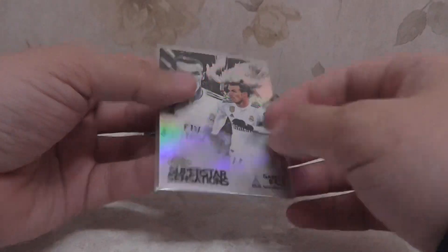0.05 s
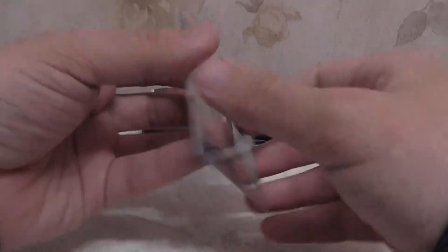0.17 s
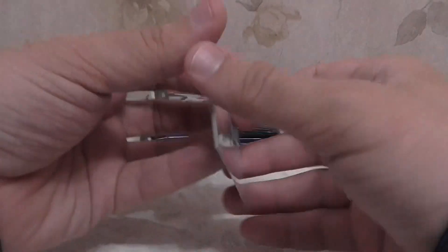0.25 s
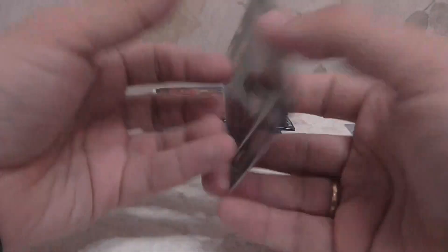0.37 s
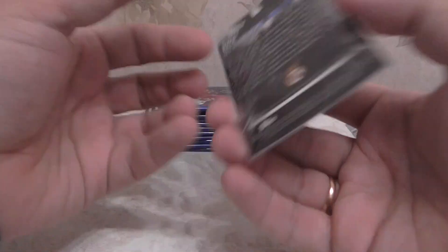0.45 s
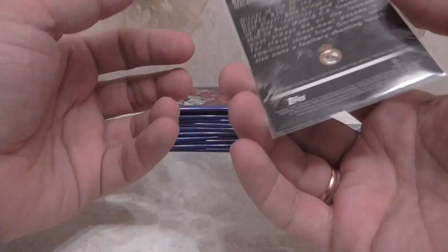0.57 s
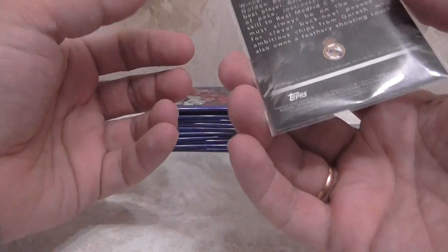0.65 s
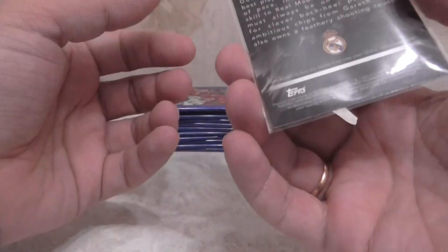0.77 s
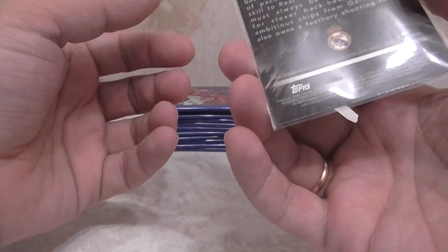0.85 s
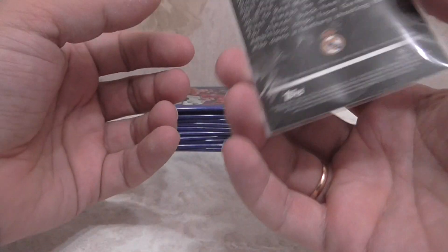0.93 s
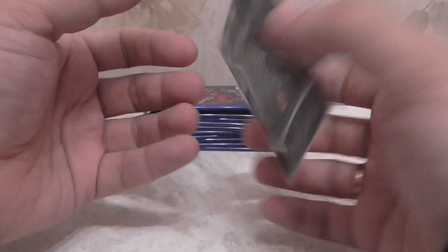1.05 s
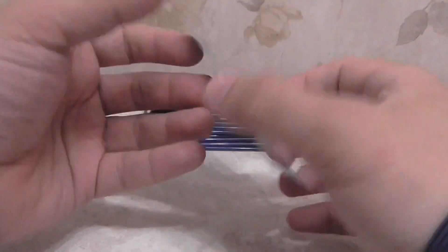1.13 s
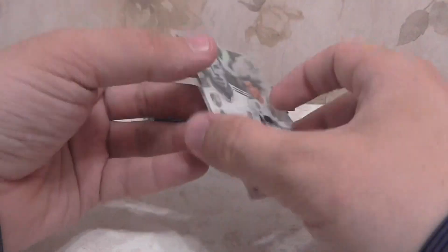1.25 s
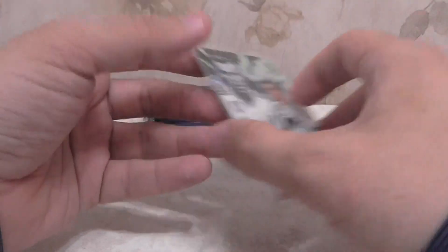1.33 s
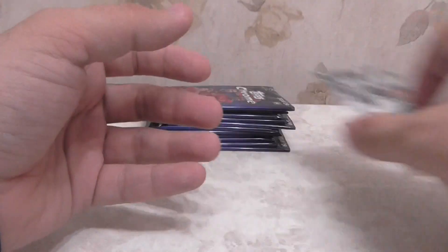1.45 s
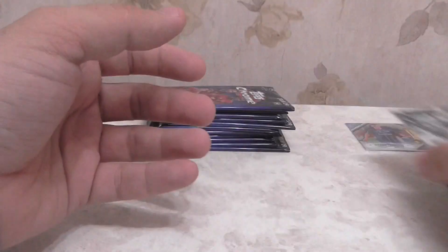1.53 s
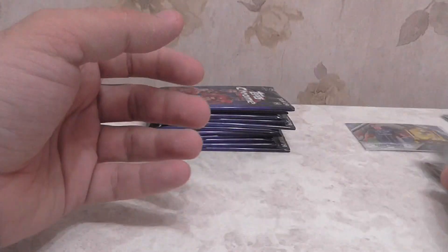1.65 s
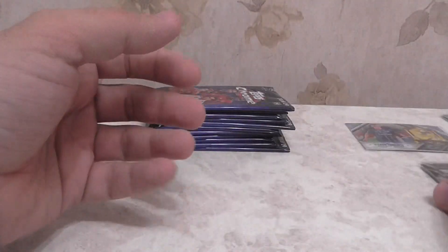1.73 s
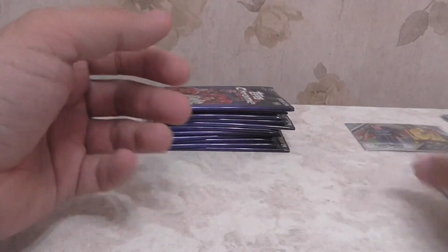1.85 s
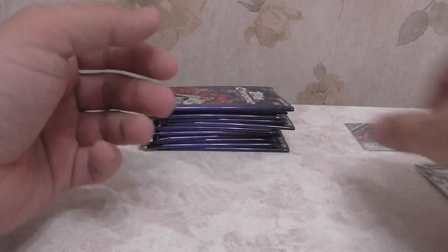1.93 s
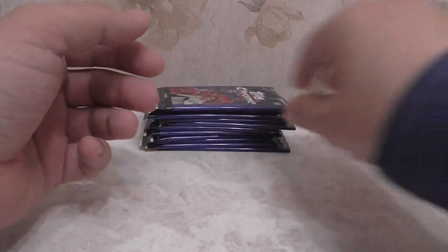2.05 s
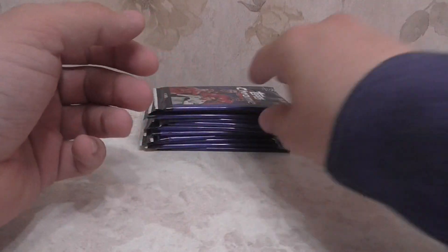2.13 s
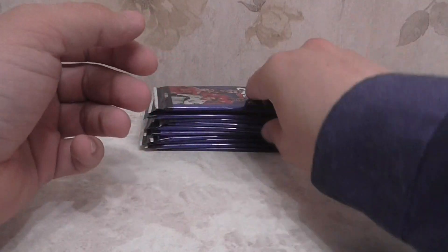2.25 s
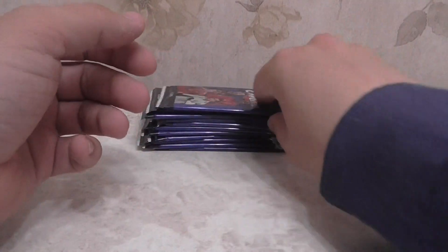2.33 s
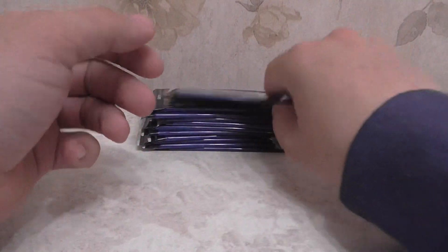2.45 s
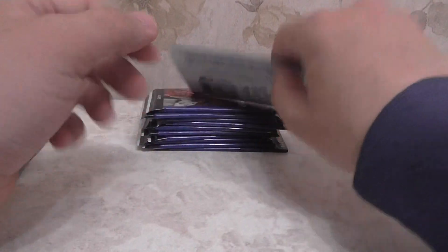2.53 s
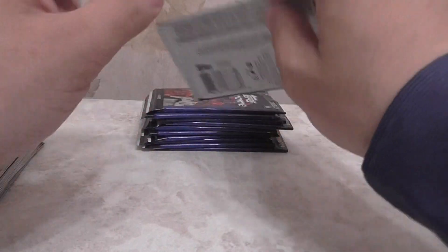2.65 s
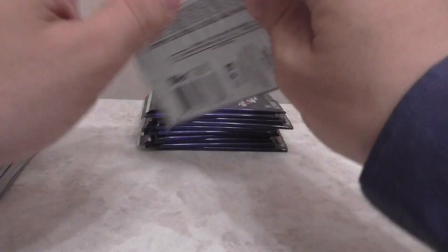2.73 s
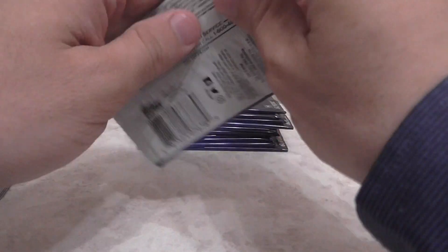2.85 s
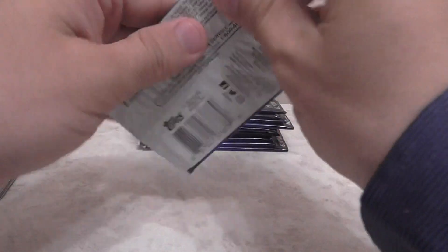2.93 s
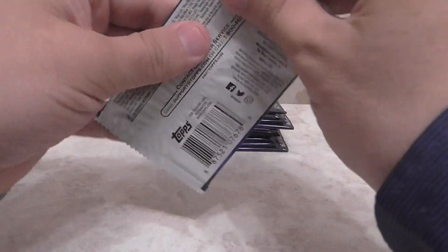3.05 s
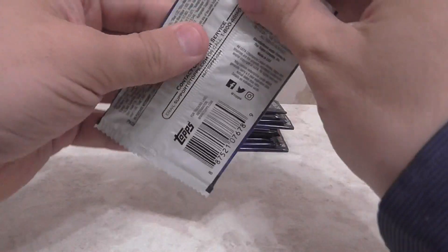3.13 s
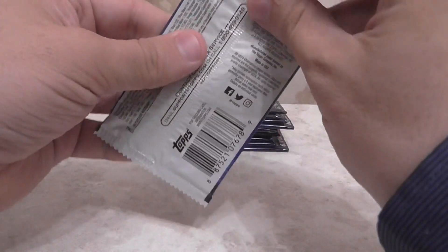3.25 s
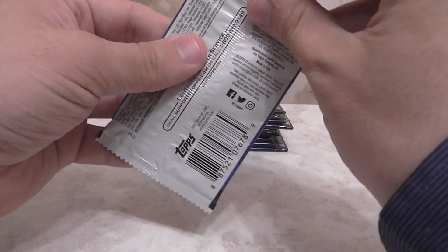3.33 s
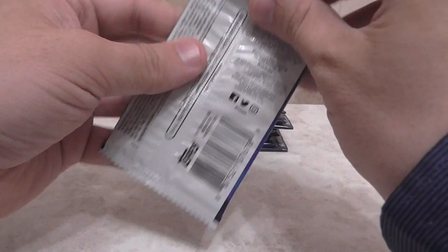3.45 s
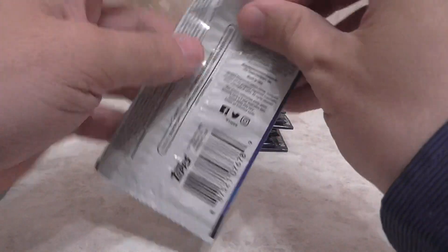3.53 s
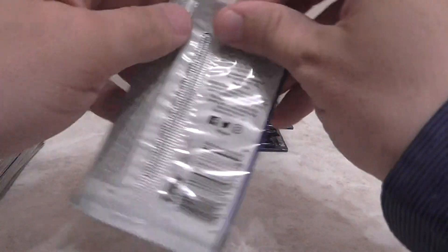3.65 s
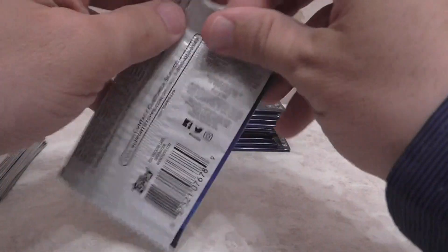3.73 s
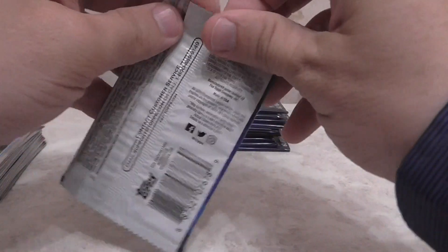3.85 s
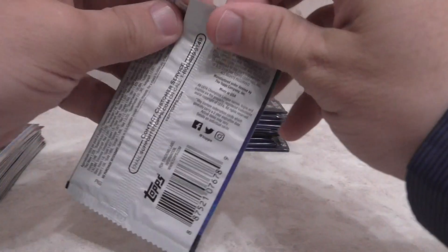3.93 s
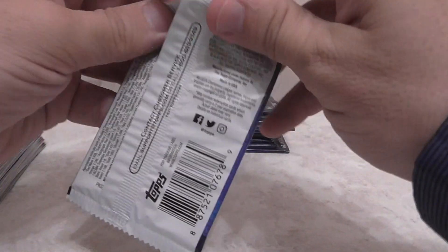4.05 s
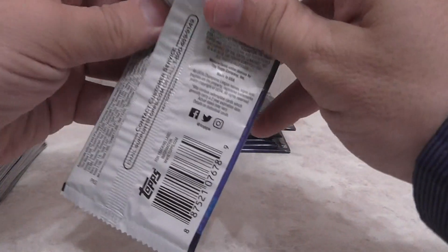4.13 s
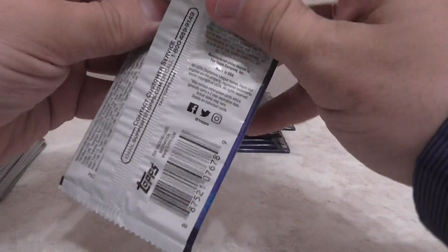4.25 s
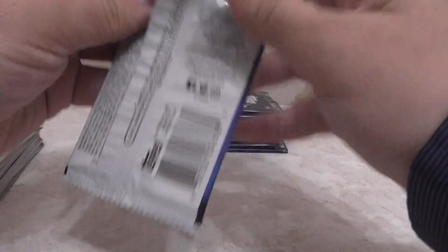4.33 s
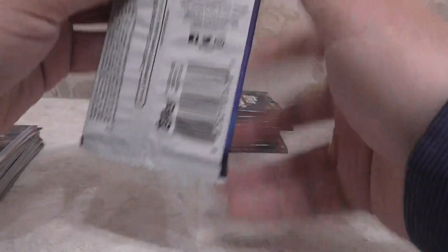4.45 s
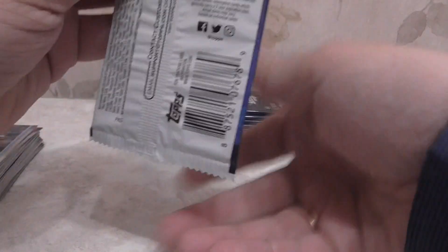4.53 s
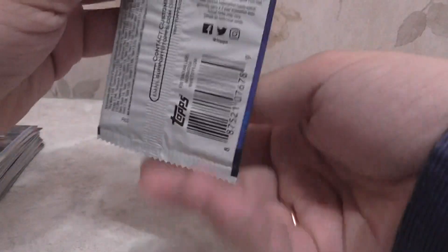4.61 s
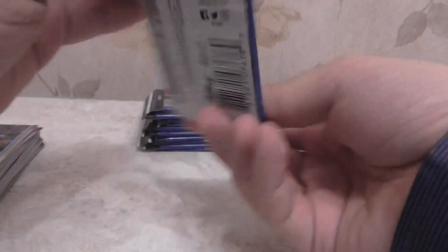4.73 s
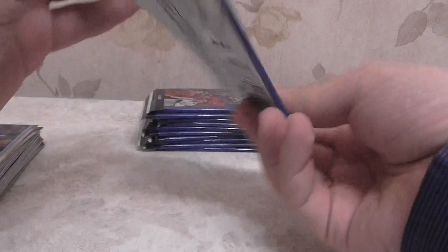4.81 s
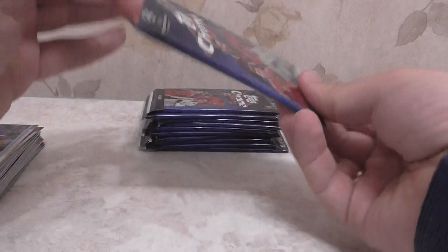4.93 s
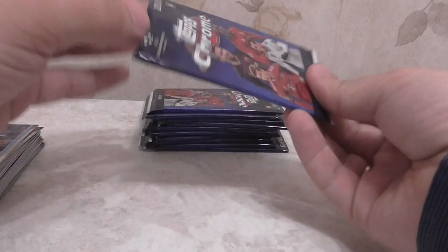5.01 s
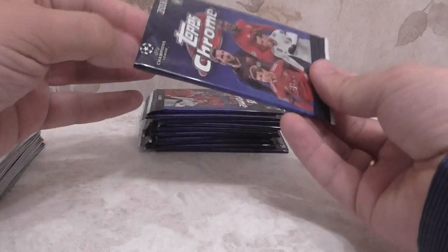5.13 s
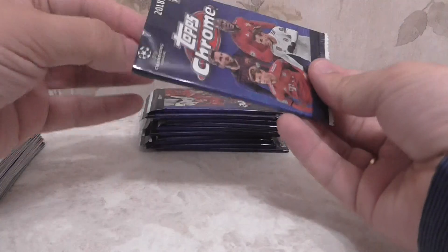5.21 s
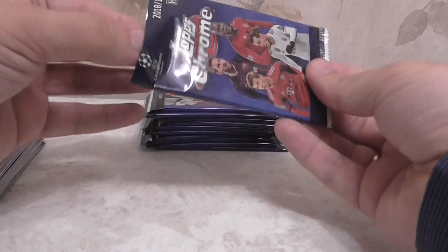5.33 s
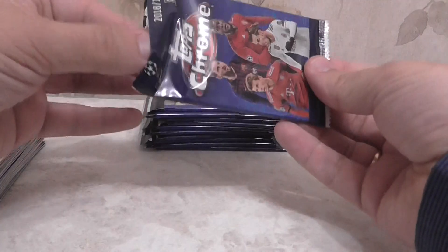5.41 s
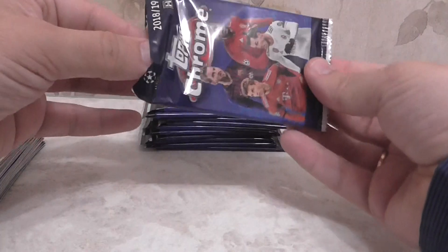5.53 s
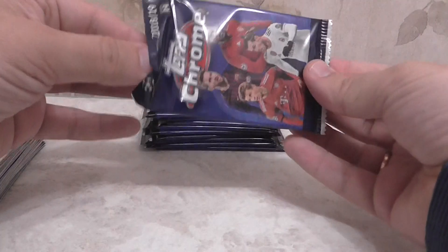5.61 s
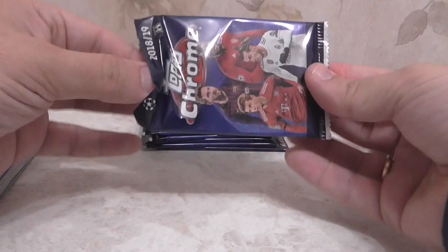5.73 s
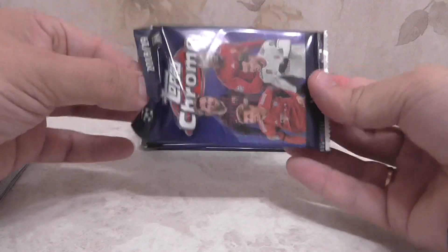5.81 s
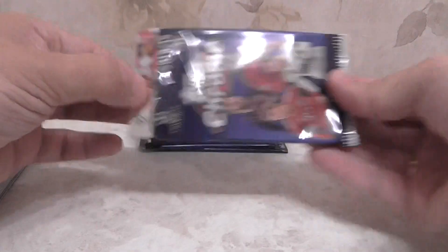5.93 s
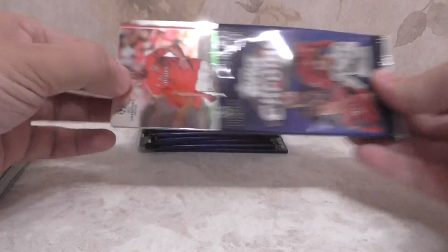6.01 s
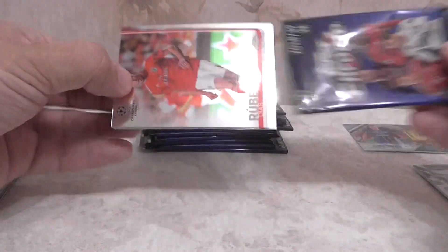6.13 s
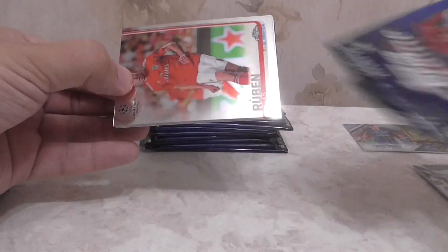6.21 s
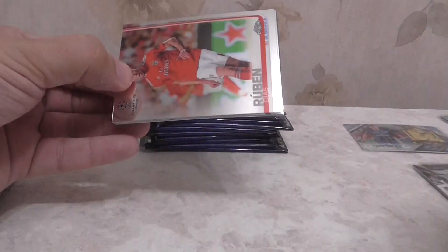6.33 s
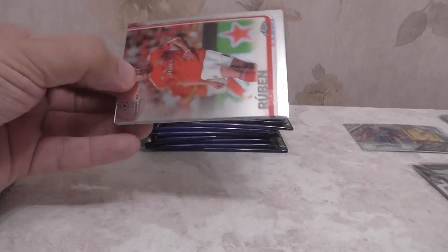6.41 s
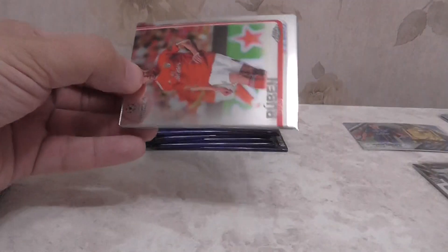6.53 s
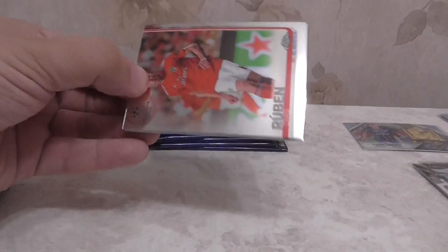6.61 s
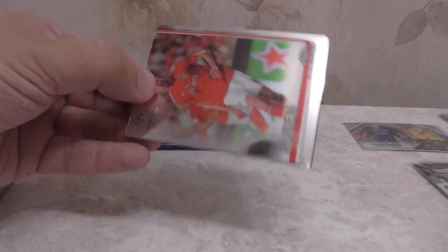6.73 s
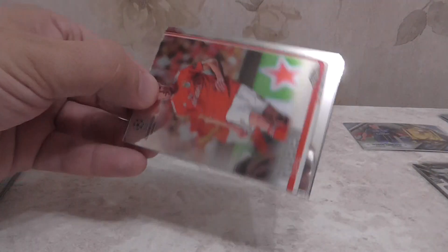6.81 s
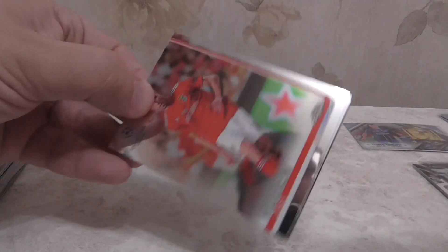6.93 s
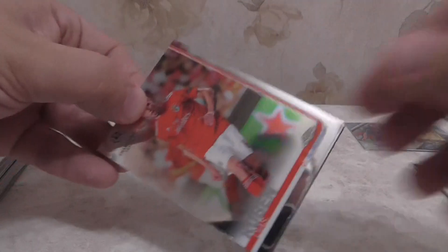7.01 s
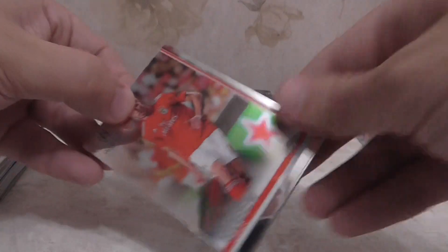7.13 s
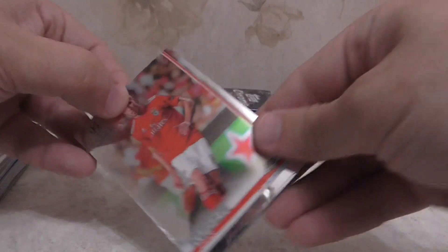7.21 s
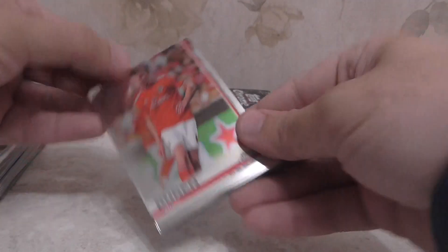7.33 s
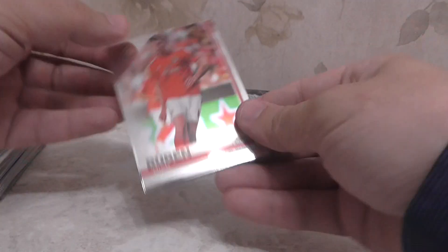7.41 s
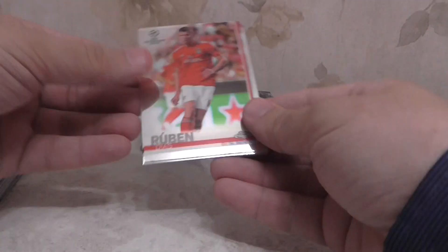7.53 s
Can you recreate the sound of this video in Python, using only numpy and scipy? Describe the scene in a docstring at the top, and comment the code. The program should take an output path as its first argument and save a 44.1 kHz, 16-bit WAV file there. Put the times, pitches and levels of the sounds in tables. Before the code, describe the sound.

Close stereo pickup of hands at a table indoors. At first only light sleeve ticks, dull skin brushing and low soft thumps over faint room rumble. A foil wrapper then bursts into quick bright snaps and gritty rustling, with stiff cards knocking beneath. After the cards are pulled free, crackling fades to sparse ticks, a near pause, and light card scuffs.

```python
"""In a small, quiet room with a low rumble, hands turn a sleeved trading card and lay it down on a table.
Then they take a foil pack, tear it open and slide the cards out, heard by two close microphones.
Creases in the film buckle in millisecond snaps that also knock the stiff cards: short noise bursts and ringing modes.
Between the snaps film, cards and skin rub: noise broken up by tiny catches. Hands bump softly: low decaying cycles."""
import sys
import numpy as np
from scipy import signal
from scipy.fft import rfft, irfft
from scipy.io import wavfile

SR = 44100
rng = np.random.default_rng(int(sys.argv[2]) if len(sys.argv) > 2 else 0)


def master_out(mix):
    """Clip the mix to full scale and print it as 16-bit PCM to the path in sys.argv[1]."""
    frames = np.transpose(np.atleast_2d(mix))
    ceiling = np.clip(frames, -1, 1)
    pcm = np.round(ceiling * 32767).astype(np.int16)
    wavfile.write(sys.argv[1], SR, pcm)


N = 333396

SNAP_SIZE = 4096  # samples in one snap


def from_db(db):
    """Turn decibels into gain."""
    return 10 ** (np.asarray(db) / 20)


def rms_one(x):
    """Scale to an average strength (rms) of 1."""
    return x / np.sqrt(np.mean(x ** 2) + 1e-20)


def unit_burst(x):
    """Scale to the energy of one millisecond at rms 1, so that short bursts compare fairly."""
    return x * np.sqrt(SR * 0.001 / (np.sum(x ** 2) + 1e-20))


def in_time(rows):
    """Read each column of a curve, sample by sample."""
    s, *columns = np.transpose(rows)
    return [np.interp(np.arange(N) / SR, s, column) for column in columns]


def at_hz(points, hz):
    """Read a spectrum on a log-frequency axis, as pitch is heard."""
    f, value = np.transpose(points)
    return np.interp(np.log(np.maximum(hz, 1)), np.log(f), value)


def colour(x, spectrum, size=4096):
    """Filter with the given spectrum, responding as early as possible (minimum phase)."""
    log_gain = np.log(from_db(at_hz(spectrum, np.fft.rfftfreq(size, 1 / SR))))
    # folding the cepstrum leaves nothing ahead of the sound
    cepstrum = irfft(log_gain)
    cepstrum[1:size // 2] *= 2
    cepstrum[size // 2 + 1:] = 0
    response = irfft(np.exp(rfft(cepstrum)))
    response = response.reshape((1,) * (x.ndim - 1) + (-1,))
    return signal.fftconvolve(x, response, axes=-1)[..., :x.shape[-1]]


def drift(rate):
    """Random wander of rms 1, drawn toward a new value `rate` times per second."""
    knots = np.arange(N) / SR * rate
    return rms_one(np.interp(knots, np.arange(N), rng.standard_normal(N)))


def add(track, s, sound):
    """Mix a sound in at time s."""
    start = int(np.clip(s * SR, 0, N - 1))
    track[start:start + len(sound)] += sound[:N - start]


def room_tone(side_db, waver_db):
    """The quiet room: a low rumble that wavers slightly, with faint hiss, from filtered noise."""
    # colour of the quiet room: (frequency [Hz], relative level [dB])
    floor_spectrum = [(25, -21.5), (50, -6), (90, -3), (150, 4), (220, -4), (320, 0), (480, -3), (750, -6),
                      (1100, -12.5), (1700, -12), (2900, -21.5), (5000, -19), (9000, -23.5), (16000, -27)]
    mid, side = rms_one(colour(rng.standard_normal((2, N)), floor_spectrum))
    tone = mid + from_db(side_db) * side * [[1], [-1]]
    low = signal.sosfilt(signal.butter(2, 300, fs=SR, output="sos"), tone)
    waver = from_db(waver_db * drift(11))
    return from_db(-61) * (tone + low * (waver - 1))


def room(x, wall_s, wall_db, tail_db, side_db, size=22050):
    """The wall behind the table echoes in a diffuse tail that dies at its own pace in each pitch range."""
    # colour of the room's answer: (frequency [Hz], relative level [dB])
    room_spectrum = [(80, -9), (300, 2.5), (800, -2), (2000, 3), (3000, -1.5), (5000, -9), (8500, -9.5),
                     (12000, -8), (16000, -3.5)]
    # how long the tail takes to fall by 60 dB: (frequency [Hz], decay time [s])
    decay_times = [(100, 0.66), (500, 0.37), (2000, 0.33), (6000, 0.69), (16000, 0.34)]
    t, hz = np.arange(size) / SR, np.fft.rfftfreq(size, 1 / SR)
    noise, tail = rfft(rng.standard_normal((2, size))), 0
    for k, (_, t60) in enumerate(decay_times):
        # this band fades in and out between its neighbours
        share = at_hz([(f, float(j == k)) for j, (f, _) in enumerate(decay_times)], hz)
        tail = tail + irfft(noise * share, size) * from_db(-60 * t / t60)
    # the tail builds up until the wall answers
    tail = tail * np.clip(t / wall_s, 0, 1) ** 2
    tail *= from_db(tail_db) / np.sqrt(np.sum(tail[0] ** 2))
    tail[0, int(wall_s * SR)] += from_db(wall_db)
    answer = colour(tail, room_spectrum)
    mid, side = signal.fftconvolve(x[None], answer, axes=-1)[:, :N]
    return mid + from_db(side_db) * side * [[1], [-1]]


def bumps(swell_s, gain_db):
    """Soft flesh of hands and arms on the table: a few low cycles that swell and die."""
    # soft bumps: (time [s], peak of the swell before gain_db [dB], pitch [Hz])
    bump_rows = [(0.003, -40, 142), (0.506, -42, 134), (0.668, -51, 148), (0.825, -57, 174),
                 (0.964, -44, 115), (1.792, -47, 96), (1.939, -43, 150), (2.451, -46.5, 142),
                 (4.76, -47, 77), (6.716, -42.5, 120)]
    out, t = np.zeros(N), np.arange(2 * SNAP_SIZE) / SR
    swell = t / swell_s * np.exp(1 - t / swell_s)
    for s, db, hz in bump_rows:
        add(out, s, from_db(db + gain_db) * swell * np.sin(2 * np.pi * hz * t))
    return out


def stroke_levels():
    """Hiss, sheen and scuff in dB through time: each stroke bites, presses to a crest, eases and lets go."""
    # strokes of fingers, card and film on each other, levels before the gains in rubbing():
    # (time [s], length [s], crest place [share of length], film hiss [dB],
    #  sheen relative to the hiss [dB], card scuff [dB])
    stroke_rows = [(0, 0.055, 0.039, -55.5, 1.5, -60), (0.077, 0.58, 0.64, -60, -4.5, -55.5),
                   (1.048, 0.27, 0.12, -59, -22, -54.5), (1.2, 0.059, 0.1, -51, -6.5, -51.5),
                   (1.275, .39, 0.53, -57, -21, -57), (1.767, 0.097, 0.29, -52, -21, -46.5),
                   (1.98, 0.36, 0.64, -61.5, -21, -60), (2.348, 0.39, 0.74, -54.5, .5, -58),
                   (2.765, 0.35, 0.2, -48, -9, -51.5), (3.034, 0.13, 1, -41.5, -9, -40.5),
                   (3.17, .11, .3, -47.5, -17, -57), (3.268, 0.16, 0.53, -45, -13, -53),
                   (3.418, .1, 0.55, -49, -5.5, -45), (3.521, 0.055, 0.39, -38, -10, -46),
                   (3.685, 0.091, 0.39, -54.5, -5, -51.5), (3.82, 0.055, .35, -45, -8, -55),
                   (3.952, 0.044, 0.3, -40, -20, -65), (4.025, 0.073, 0.74, -36, -23, -45.5),
                   (4.093, 0.073, 0.68, -42, -4, -44), (4.323, 0.12, 0.67, -36, -13, -48),
                   (4.4, 0.37, 0.072, -56.5, -24, -52), (4.702, 0.21, 0.34, -40, -14, -45),
                   (4.862, 0.099, 0.34, -30, -11, -36), (5.011, 0.14, 0.46, -53.5, -6.5, -50.5),
                   (5.196, 0.069, 0.18, -39, -9, -41.5), (5.303, 0.13, 0.68, -40, -12, -43),
                   (5.441, 0.068, 0.55, -37.5, -19, -45), (5.681, 0.083, 0.29, -45.5, -4.5, -48.5),
                   (5.759, 0.37, 0.17, -48, -11, -51), (5.942, 0.18, 0.25, -37.5, -2, -36.5),
                   (6.061, .175, 0.58, -41.5, -3.5, -42.5), (6.213, 0.23, 0.16, -51, -18, -48),
                   (6.422, 0.062, .2, -41, -15, -50), (6.475, 0.062, 0.58, -40, -8, -41.5),
                   (6.516, 0.14, .08, -55.5, -24, -48), (6.688, 0.089, 0.36, -48, -22, -49),
                   (6.745, 0.39, 0.089, -64, -27.5, -61), (7.156, 0.13, 0.19, -47, -25, -50),
                   (7.513, 0.15, 0.13, -37, -28, -36)]
    bite_s, let_go_s, sag_db = 0.0046, 0.0063, 13
    # fingers that only hold the cards still brush them: hiss, sheen, scuff
    holding_db = [[-74], [-88.5], [-74]]
    t = np.arange(N) / SR
    power = np.zeros((3, N)) + from_db(holding_db) ** 2
    for s, length, crest, hiss_db, sheen_db, scuff_db in stroke_rows:
        during = (t > s) & (t < s + length)
        age, crest = t[during] - s, np.clip(crest, 0.03, 0.97)
        contact = np.clip(np.minimum(age / bite_s, (length - age) / let_go_s), 0, 1)
        # 0 at the crest, 1 at either end
        place = age / length
        off_crest = np.maximum(1 - place / crest, (place - crest) / (1 - crest))
        crest_db = np.array([[hiss_db], [hiss_db + sheen_db], [scuff_db]])
        power[:, during] += (contact * from_db(crest_db - sag_db * off_crest)) ** 2
    return 10 * np.log10(power)


def friction(grain_db, catches_per_s, size_db, catch_s):
    """Tiny catches of the surface, each a brief burst of noise, over smooth sliding noise."""
    sizes = from_db(size_db * np.minimum(rng.exponential(1, N), 3))
    catches = sizes * (rng.random(N) < catches_per_s / SR)
    # each catch dies away over catch_s
    slips = signal.lfilter([1], [1, -np.exp(-1 / (catch_s * SR))], catches + 1e-18)
    grain = from_db(grain_db)
    caught = grain * rms_one(slips * rng.standard_normal(N))
    smooth = rng.standard_normal(N)
    return (caught + smooth) / np.hypot(grain, 1)


def off_table(x, delay_s, sway, echo_db):
    """The table top returns a copy just behind the sound; its delay sways slowly as the hands move."""
    lag = delay_s * SR * np.exp(sway * drift(3))
    echo = from_db(echo_db)
    copy = np.interp(np.arange(N) - lag, np.arange(N), x)
    return (x + echo * copy) / np.hypot(1, echo)


def rubbing(hiss_db, sheen_db, scuff_db, grain_db, unsteady_db, skin_db, skin_slope,
            hiss_gain_db, sheen_gain_db, scuff_gain_db):
    """Thin film catches in quick fine ticks; card edges catch more slowly and knock; skin brushes dully."""
    # colours of rubbing film, glossy faces, card edges and skin: (frequency [Hz], relative level [dB])
    hiss_spectrum = [(1500, -18.5), (2800, -12), (3800, -2.5), (5100, 1.5), (6500, 0.5), (8200, -3),
                     (9500, -8.5), (11000, -25), (16000, -22)]
    sheen_spectrum = [(5000, -26), (7800, 2), (10000, 2), (11500, -1.5), (13500, -4), (16000, -14)]
    scuff_spectrum = [(250, -7), (450, 4), (740, 5), (1100, -3), (1500, -1), (2100, -6.5), (2800, -13),
                      (5000, -30)]
    skin_spectrum = [(60, -21), (170, -1.5), (320, 4.5), (700, -19.5)]
    film = friction(grain_db, catches_per_s=360, size_db=2.5, catch_s=0.00036)
    edges = friction(grain_db, catches_per_s=130, size_db=4, catch_s=0.0019)
    pressure = from_db(unsteady_db * drift(70))
    # rubs hiss up to about 10 kHz; glossy faces gliding on each other add the sheen above
    dull_film = signal.sosfilt(signal.butter(6, 10500, fs=SR, output="sos"), film)
    hiss = from_db(hiss_db + hiss_gain_db) * rms_one(colour(dull_film, hiss_spectrum))
    sheen = from_db(sheen_db + sheen_gain_db) * rms_one(colour(film, sheen_spectrum))
    scuff = from_db(scuff_db + scuff_gain_db) * rms_one(colour(edges, scuff_spectrum))
    # soft skin grows less with force than the stiff cards do, so hard rubs are brighter
    skin_level_db = skin_db + skin_slope * (scuff_db - np.mean(scuff_db))
    skin = from_db(skin_level_db) * rms_one(colour(edges, skin_spectrum))
    reflected = off_table(hiss + sheen + scuff, delay_s=0.000899, sway=0.316, echo_db=-12)
    return pressure * (reflected + skin)


def crinkles(hiss_db, scuff_db, grain_db):
    """Small creases snap at random: more on a grainy surface, stronger under a harder stroke."""
    per_s = 27  # where catches equal smooth sliding
    # typical levels under an ordinary stroke, before the gains in snaps(); the thud is relative to the knock
    typical_film_db, typical_knock_db, thud_db, spread_db = -40, -43, -14.5, 2.5
    typical_hz, typical_knock_hz, spread_octaves = 6500, 1100, 0.3
    # follows: share of a stroke's swing in level that the small creases take on
    ordinary_stroke_db, follows = -48, 0.91
    at = np.flatnonzero(rng.random(N) < per_s * from_db(grain_db) / SR)
    film, pitch, knock, knock_pitch = rng.standard_normal((len(at), 4)).T
    film_db = typical_film_db + follows * (hiss_db[at] - ordinary_stroke_db) + spread_db * film
    knock_db = typical_knock_db + follows * (scuff_db[at] - ordinary_stroke_db) + spread_db * knock
    crease_hz = typical_hz * 2 ** (spread_octaves * pitch)
    knock_hz = typical_knock_hz * 2 ** (spread_octaves * knock_pitch)
    return np.column_stack([at / SR, film_db, crease_hz, knock_db, knock_hz, knock_db + thud_db])


def struck(modes, t, spread_db, centre_hz=None, focus_db=0):
    """One blow: each mode rings with its own strength; those near centre_hz lose least (focus_db per octave)."""
    hz, db, t60 = np.transpose(modes)[:, :, None]
    if centre_hz:
        db = db - focus_db * np.abs(np.log2(hz / centre_hz))
    strength = from_db(db + spread_db * rng.standard_normal(hz.shape))
    strength = strength * rng.choice([-1, 1], hz.shape)
    grip = 1 + 0.049 * rng.standard_normal(hz.shape)  # the grip detunes the modes
    ringing = from_db(-60 * t / t60) * np.sin(2 * np.pi * hz * grip * t)
    motion = np.sum(strength / hz * ringing, axis=0)
    # a small plate radiates its change of motion; the contact takes a moment to build
    return np.diff(motion * (1 - np.exp(-t / 0.00013)), prepend=0)


def snaps(rows, decay_s, settle_db, settle_s, crease_width_hz, facet_ratio, broad_db, focus_db,
          film_gain_db, knock_gain_db, thud_gain_db):
    """A crease flips: a sharp crack rings in the two facets beside it, flutters and knocks the cards."""
    # modes of the held cards, then low modes of pack, hand and table:
    # (frequency [Hz], strength before random spread [dB], time to fall by 60 dB [s])
    card_modes = [(490, -3.5, 0.019), (677, 0, 0.025), (788, -0.5, 0.037), (906, -4, 0.019),
                  (1100, -1.5, 0.015), (1408, -2, 0.026), (1830, 9.5, 0.011), (2206, 8.5, 0.015)]
    thud_modes = [(90, -14, 0.034), (160, -8.5, 0.04), (254, 4, 0.0094), (335, 6.5, 0.016),
                  (415, -5, 0.0092)]
    # colour of the cracking film: (frequency [Hz], relative level [dB])
    film_spectrum = [(500, -28), (1700, -36), (2700, -12.5), (3400, -3), (4100, -5), (4900, 1),
                     (6800, -1.5), (8200, 8), (10000, -0.5), (12000, -5), (16000, -12)]
    out, t = np.zeros(N), np.arange(SNAP_SIZE) / SR
    flutter = from_db(settle_db) * np.exp(-t / settle_s)
    envelope = (1 - np.exp(-t / 0.000099)) * (np.exp(-t / decay_s) + flutter)
    cracks = colour(rng.standard_normal((len(rows), SNAP_SIZE)) * envelope, film_spectrum, size=1024)
    r = np.exp(-np.pi * crease_width_hz / SR)

    def facet(crack, hz):
        """A flat piece of film rings at its own pitch: a resonance."""
        ring = [1, -2 * r * np.cos(2 * np.pi * hz / SR), r * r]
        return unit_burst(signal.lfilter([1, 0, -1], ring, crack))

    for crack, (s, film_db, crease_hz, knock_db, knock_hz, thud_db) in zip(cracks, rows):
        # the larger facet rings below the crease's pitch, the smaller one above it
        below, above = rng.uniform(0.32, 1, 2)
        large = facet(crack, crease_hz * facet_ratio ** -below)
        small = facet(crack, crease_hz * facet_ratio ** above)
        film = unit_burst(unit_burst(large - small) + from_db(broad_db) * unit_burst(crack))
        knock = unit_burst(struck(card_modes, t, 4.2, knock_hz, focus_db))
        thud = unit_burst(struck(thud_modes, t, 2.3))
        add(out, s, from_db(film_db + film_gain_db) * film)
        add(out, s, from_db(knock_db + knock_gain_db) * knock)
        add(out, s, from_db(thud_db + thud_gain_db) * thud)
    return out


def handling(rows, levels, grain_db):
    """All that film and cards radiate in one direction: snaps and rubbing."""
    cracks = snaps(rows, decay_s=0.00031, settle_db=-11.5, settle_s=0.0018, crease_width_hz=930,
                   facet_ratio=1.31, broad_db=-5, focus_db=17,
                   film_gain_db=-1.08, knock_gain_db=-1.56, thud_gain_db=0.0)
    rubs = rubbing(*levels, grain_db, unsteady_db=2.5, skin_db=-66, skin_slope=0.53,
                   hiss_gain_db=-2.43, sheen_gain_db=0.6, scuff_gain_db=-1.35)
    return cracks + rubs


def scene():
    """Handling close to the two microphones, with the room's answer and its quiet rumble."""
    # buckling creases and card contacts, levels as rms over 1 ms before the gains in snaps():
    # (time [s], film [dB], crease pitch [Hz], card knock [dB], knock pitch [Hz], low thud [dB])
    snap_rows = [(0.1219, -38, 7700, -57, 900, -44.5), (0.2015, -40, 6260, -44.5, 800, -49),
                 (0.3549, -35.5, 7960, -48, 750, -40.5), (0.4323, -34, 7400, -44, 690, -52),
                 (0.4537, -36, 9800, -64, 1050, -54), (1.2405, -38, 7200, -42, 806, -33),
                 (1.4665, -25, 7470, -35, 1040, -43), (1.7683, -44, 6100, -38.5, 760, -50),
                 (1.783, -38, 4670, -36.5, 1060, -32.5), (1.8003, -42, 5200, -40, 610, -27.5),
                 (2.19, -57, 4100, -43, 790, -39), (2.8701, -21, 7300, -32, 865, -59),
                 (2.8835, -33, 7140, -30.5, 810, -40), (2.9452, -33.5, 7300, -38, 790, -43),
                 (2.971, -36, 7800, -50, 810, -54), (3.0435, -37, 7460, -41, 910, -45),
                 (3.1153, -15.5, 7750, -38, 1100, -47), (3.1215, -18, 7750, -25, 930, -34.5),
                 (3.1248, -13.5, 5960, -49, 840, -31.5), (3.133, -32, 5800, -49, 840, -36.5),
                 (3.149, -22, 5300, -31, 890, -36), (3.1526, -11.5, 5430, -25.5, 900, -35),
                 (3.208, -29, 5400, -46, 1050, -51), (3.3442, -14, 4680, -27.5, 1160, -39),
                 (3.3753, -29.5, 5800, -24.5, 584, -30), (3.389, -28.5, 8600, -35, 756, -38),
                 (3.4836, -42, 6900, -27.5, 700, -48), (3.5363, -12.5, 8600, -38, 920, -53),
                 (3.5494, -19, 7700, -30.5, 1030, -50), (3.5596, -13, 7550, -27.5, 810, -42),
                 (3.5815, -14.5, 8050, -42, 980, -47), (3.5948, -22, 5940, -27.5, 585, -25.5),
                 (3.664, -33.5, 6950, -38.5, 1080, -41), (3.7369, -25, 5830, -38, 1020, -53),
                 (3.763, -16.5, 6270, -32, 1000, -58), (3.7763, -26, 7400, -35, 1490, -49),
                 (3.7931, -32, 7800, -37, 770, -48), (3.813, -32, 6300, -56, 1500, -52),
                 (3.8269, -23, 4640, -33, 1240, -44), (3.8359, -20, 7200, -33, 1250, -64),
                 (3.8441, -15, 8600, -46, 1600, -57), (3.8802, -12.5, 7600, -28, 900, -42),
                 (3.9335, -15.5, 5200, -15, 990, -46), (3.9606, -27, 7000, -46, 1530, -55),
                 (4.075, -11, 5230, -21.5, 1220, -28), (4.1032, -29, 6500, -40, 730, -48),
                 (4.1158, -26, 7550, -51, 1160, -57), (4.1262, -23, 8200, -52, 700, -51),
                 (4.1346, -13.5, 6960, -17, 860, -27), (4.1401, -20, 5150, -35, 910, -31),
                 (4.1483, -21, 7400, -53, 1110, -59), (4.1647, -31, 7300, -34, 1170, -42),
                 (4.2383, -23, 6200, -41.5, 1570, -59), (4.246, -30.5, 6500, -54, 1580, -62),
                 (4.2771, -33.5, 4950, -43, 1360, -56), (4.3281, -27, 5700, -32.5, 1160, -60),
                 (4.3971, -13, 5160, -17, 1520, -50), (4.4008, -16.5, 5060, -13.5, 694, -18),
                 (4.5068, -42, 4220, -34.5, 1070, -40), (4.7349, -16.5, 5640, -30.5, 1410, -39),
                 (4.755, -26, 6800, -50, 1390, -45), (4.7674, -17, 7540, -35.5, 1250, -43),
                 (4.7775, -11, 7800, -32, 1520, -42), (4.7802, -16.5, 6130, -32, 1320, -46),
                 (4.8516, -25, 7400, -35, 1370, -49), (4.8703, -25, 6050, -26.5, 1680, -38),
                 (4.8967, -22, 6100, -27, 795, -34), (4.9106, -19, 5900, -38, 1200, -30),
                 (4.9258, -21, 7000, -26.5, 1510, -26.5), (4.9679, -31, 4400, -33.5, 955, -44),
                 (5.0733, -35.5, 5330, -50, 1220, -42), (5.2075, -16.5, 9000, -27, 850, -34),
                 (5.3001, -19, 8850, -30, 786, -40), (5.365, -36, 7500, -34, 1000, -48),
                 (5.3887, -19, 8200, -25.5, 1130, -35), (5.4033, -29.5, 5900, -27.5, 734, -40),
                 (5.4729, -21, 5500, -33, 850, -50), (5.5182, -21.5, 4340, -20.5, 684, -29),
                 (5.6866, -26.5, 7660, -33, 895, -32), (5.7144, -22.5, 6100, -28.5, 1020, -59),
                 (5.7932, -26.5, 7650, -39.5, 1900, -57), (5.845, -17.5, 8900, -40, 1280, -57),
                 (5.8625, -23.5, 6360, -30.5, 1030, -55), (5.8782, -44, 5900, -30.5, 860, -34.5),
                 (5.9115, -29.5, 6550, -32, 1000, -37), (5.9198, -31.5, 7150, -38, 1240, -52),
                 (5.9732, -15.5, 7260, -30, 1940, -49), (5.9885, -20.5, 6630, -20.5, 990, -48),
                 (6.0515, -34, 7800, -28, 1030, -31), (6.0655, -48, 6400, -25.5, 950, -33),
                 (6.083, -32, 6500, -29, 885, -43), (6.1424, -20.5, 7800, -34, 1490, -39),
                 (6.158, -35, 6300, -27.5, 1300, -40), (6.19, -26, 7060, -32, 910, -35),
                 (6.1973, -29, 5700, -24, 1330, -40), (6.2234, -36, 5200, -29.5, 1220, -35),
                 (6.2445, -25, 7900, -32, 724, -33), (6.3569, -37, 6900, -38.5, 1400, -50),
                 (6.4263, -17, 6500, -30, 1330, -36), (6.534, -53, 4800, -31.5, 1460, -36.5),
                 (6.6732, -36.5, 6100, -40, 1050, -40.5), (6.7146, -28, 5730, -32, 1280, -33.5),
                 (7.519, -43, 5900, -27, 930, -37)]
    # how much the surface catches; sleeves glide, foil is grainy:
    # (time [s], catches relative to smooth sliding [dB])
    grain_curve = [(0, -6), (.4, -2), (1.1, -7), (2.7, -7.5), (2.9, 2.5), (4.4, 1), (5.9, 2), (6.05, -1),
                   (6.3, -1), (6.6, -6), (7.1, -10.5)]
    # difference between the microphones: (frequency [Hz], side relative to mid [dB])
    width_spectrum = [(60, -30.5), (250, -22.5), (600, -17.5), (1200, -9.5), (2200, -15.5), (4500, -19.5),
                      (8000, -16.5), (12000, -2.5), (16000, -21)]
    levels, (grain_db,) = stroke_levels(), in_time(grain_curve)
    hiss_db, _, scuff_db = levels
    rows = np.vstack([snap_rows, crinkles(hiss_db, scuff_db, grain_db)])
    mid = handling(rows, levels, grain_db) + bumps(swell_s=0.012, gain_db=-4.0)
    # crumpled facets radiate differently toward each microphone
    side = colour(handling(rows, levels, grain_db), width_spectrum)
    answer = room(mid, wall_s=0.011, wall_db=-27, tail_db=-12.0, side_db=-13.5)
    heard = mid + side * [[1], [-1]] + answer
    balance = from_db([[-0.15], [0.15]])
    return heard * balance + room_tone(side_db=1.5, waver_db=3.0)


def record(dry):
    """The microphones lose the deep bass; the top is cut steeply."""
    low_cut_hz, cutoff_hz = 62, 15900
    thinned = signal.sosfilt(signal.butter(2, low_cut_hz, "high", fs=SR, output="sos"), dry)
    return signal.sosfilt(signal.ellip(10, 0.2, 80, cutoff_hz, fs=SR, output="sos"), thinned)


dry = scene()
out = record(dry)
master_out(out)
```